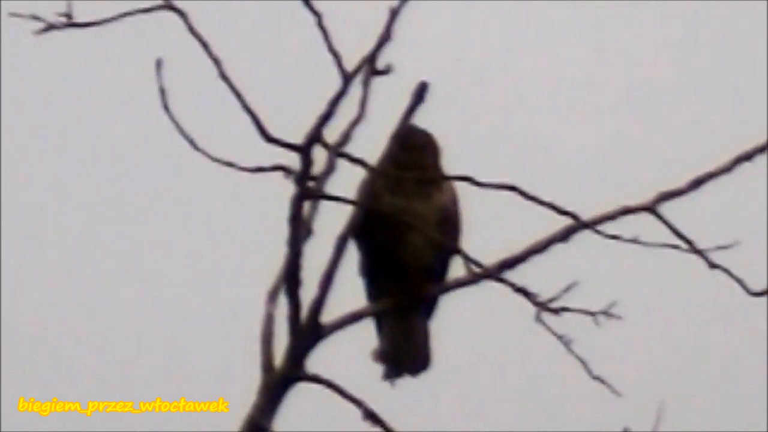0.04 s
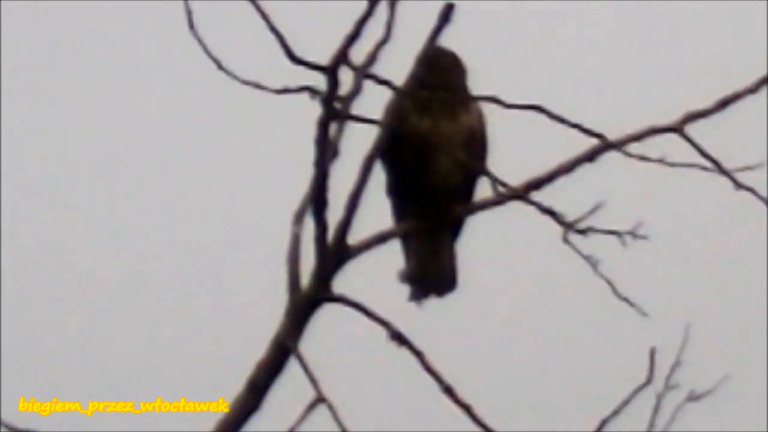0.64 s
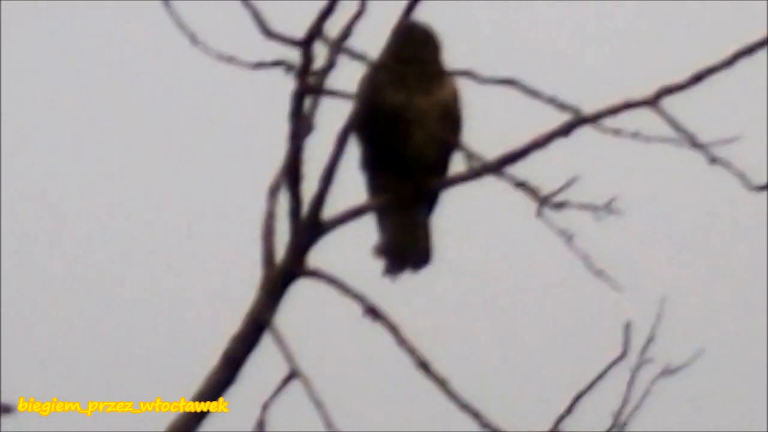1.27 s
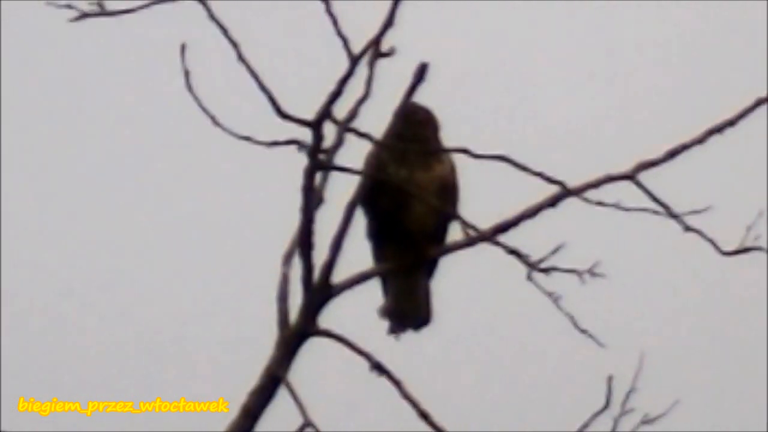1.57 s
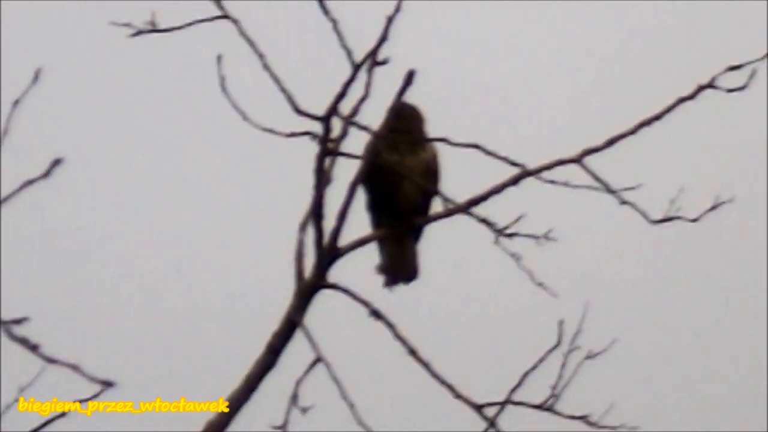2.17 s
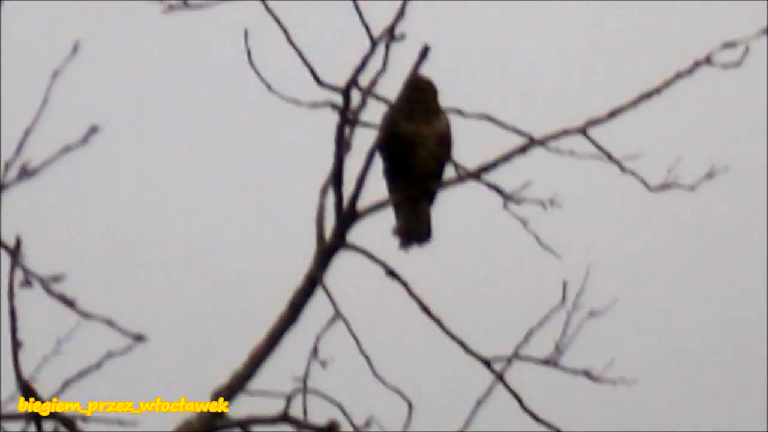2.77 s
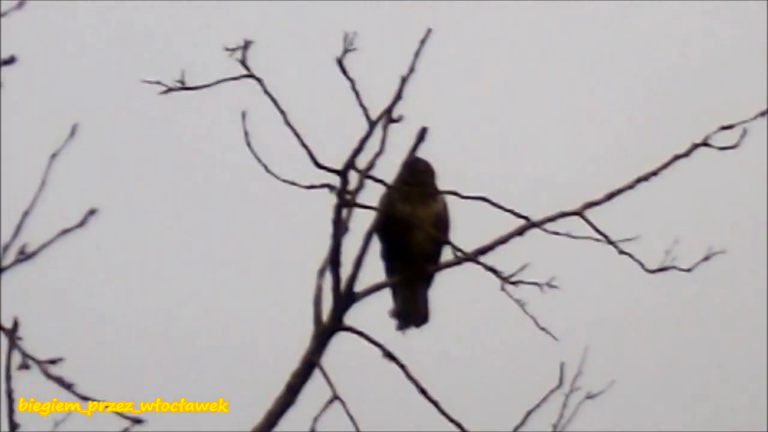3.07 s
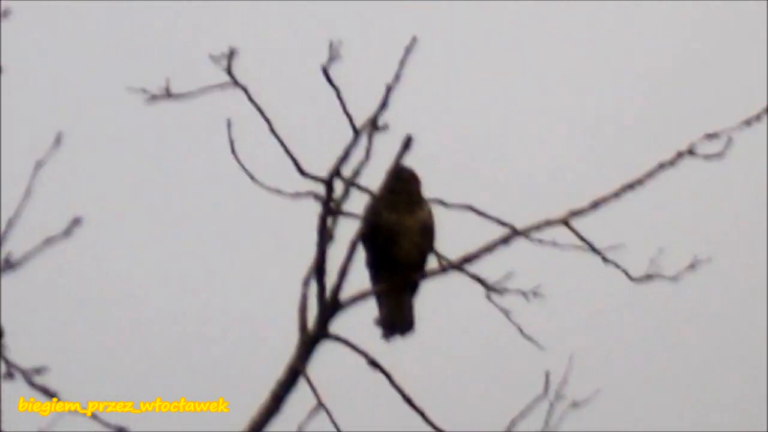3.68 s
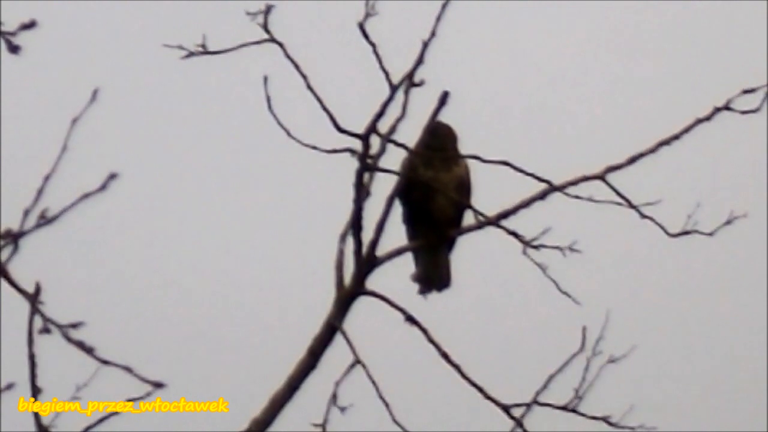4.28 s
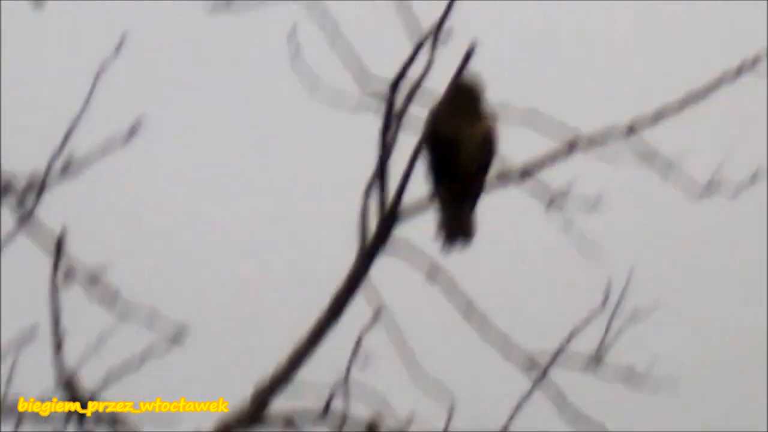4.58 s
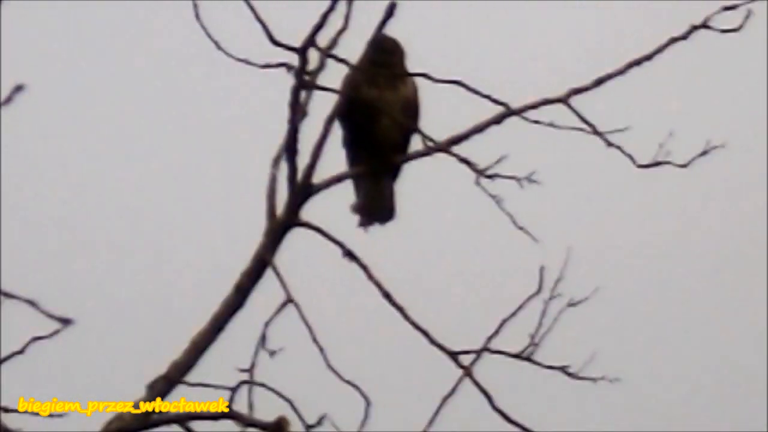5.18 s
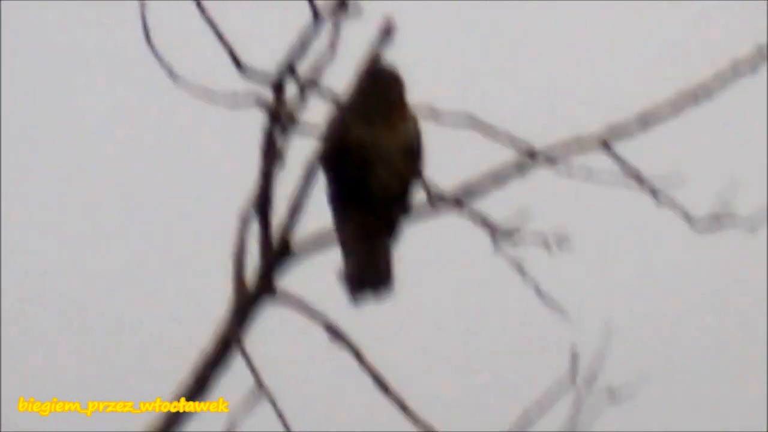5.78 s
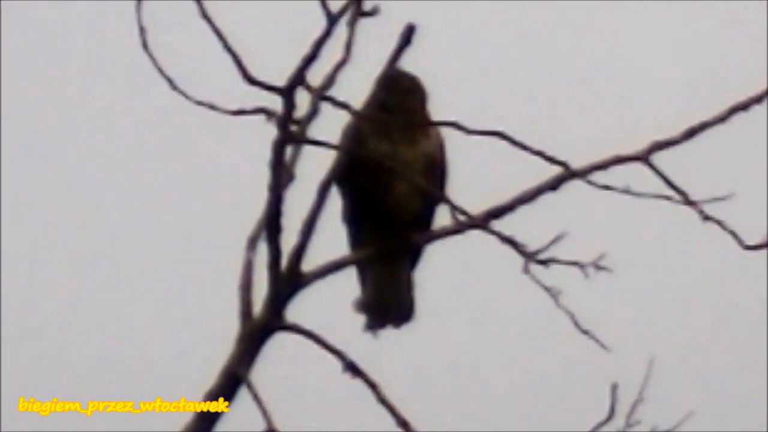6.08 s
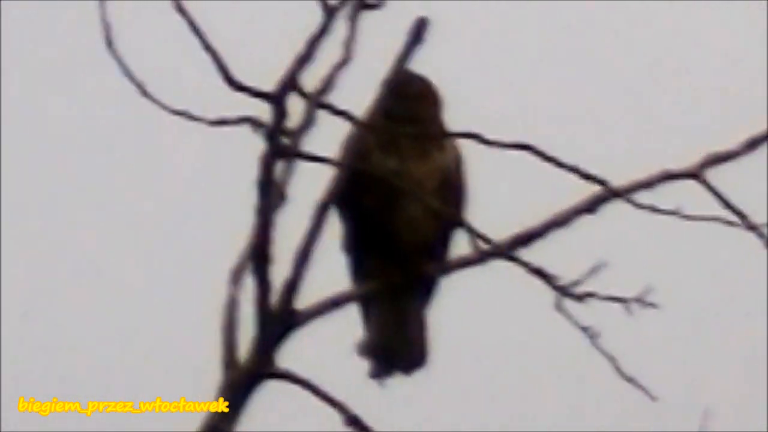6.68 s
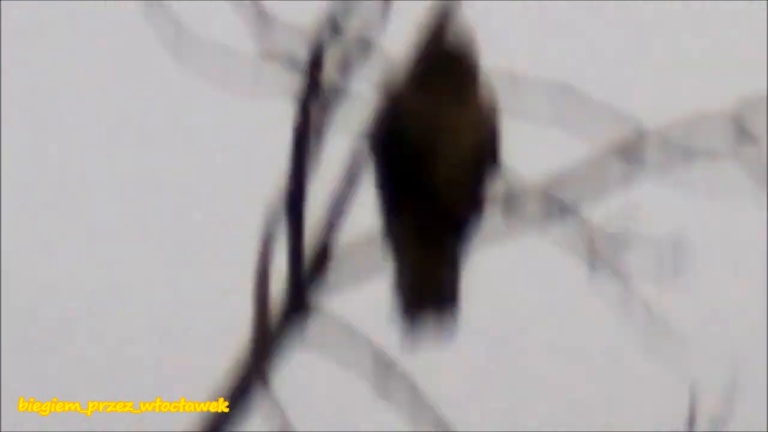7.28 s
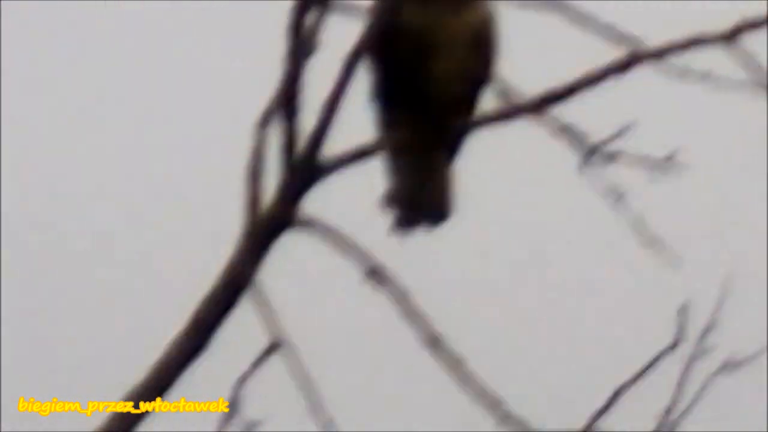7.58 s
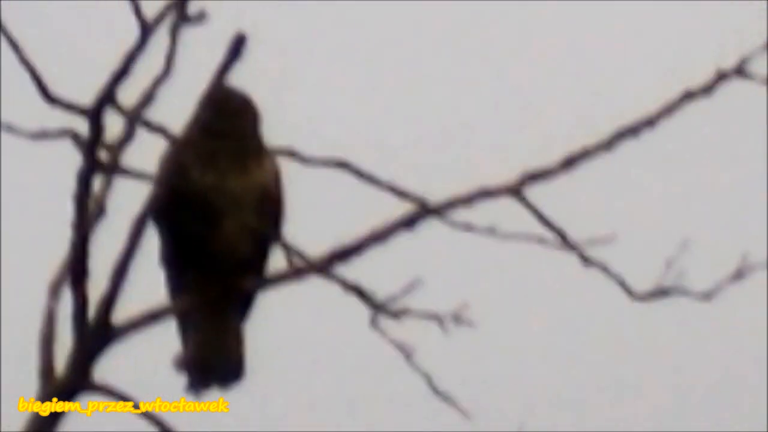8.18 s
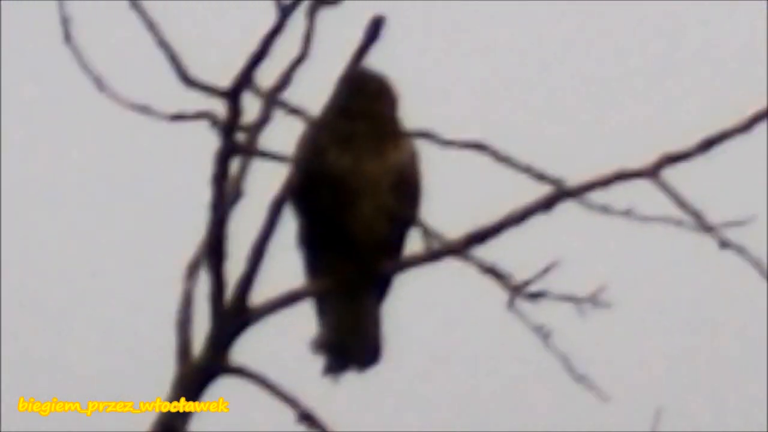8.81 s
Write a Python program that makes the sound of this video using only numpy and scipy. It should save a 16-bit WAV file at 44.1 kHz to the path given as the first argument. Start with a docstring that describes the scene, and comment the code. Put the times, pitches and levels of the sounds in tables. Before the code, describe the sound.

Sharp, irregular plastic clicks and faint finger rubs on a hand-held camera, over a soft, steady wash of outdoor wind.

```python
"""The plastic controls of a hand-held camera click in two stages, a blunt touch and a sharp snap,
ringing the case right at the microphone. Fingers rub and tick on the shell and the grip thumps softly.
Behind it, outdoors on a grey day, lies a steady, low wash of wind, and far-off traffic swells slowly."""
import sys
import numpy as np
from scipy import signal
from scipy.fft import rfft, irfft
from scipy.io import wavfile
from scipy.ndimage import uniform_filter1d

SR = 44100
rng = np.random.default_rng(int(sys.argv[2]) if len(sys.argv) > 2 else 0)


def persist_wave(psi):
    """Save psi, clipped to +-1, as 16-bit WAV."""
    counts = np.round(np.clip(psi, -1, 1) * 32767).astype(np.int16)
    wavfile.write(sys.argv[1], SR, np.atleast_2d(counts).T)


N = 390285
T = np.arange(N) / SR


def undb(db):
    """Decibels to gain."""
    return 10 ** (np.asarray(db) / 20)


def unit(x):
    """Scale to rms 1."""
    return x / np.sqrt(np.mean(x ** 2))


def add(out, s, x):
    """Mix x into out from time s on."""
    i = int(s * SR)
    out[i:i + len(x)] += x[:N - i]


def passband(x, hz, kind, order=2):
    """Butterworth filter."""
    return signal.sosfilt(signal.butter(order, np.minimum(hz, .45 * SR), kind, fs=SR, output="sos"), x)


def colour(x, points):
    """EQ x with a curve of (f/Hz, level/dB) points."""
    hz, db = np.transpose(points)
    f = np.maximum(np.fft.rfftfreq(len(x), 1 / SR), 1)
    return irfft(rfft(x) * undb(np.interp(np.log(f), np.log(hz), db)), len(x))


def drift(rate):
    """Smooth random modulation: values held 1 / rate s and slewed twice, rms 1."""
    hold = int(SR / rate)
    steps = np.repeat(rng.standard_normal(N // hold + 1), hold)
    return unit(uniform_filter1d(uniform_filter1d(steps, hold), hold)[:N])


def mode(hz, width_hz):
    """One decaying resonance, a tenth of a second long."""
    t = T[:SR // 10]
    return np.exp(-np.pi * width_hz * t) * np.sin(2 * np.pi * hz * t)


# EQ curve of the wind bed: f/Hz, level/dB
WIND_EQ = [(20, -28), (42, -7.5), (90, -6), (135, -3), (210, -1), (310, -3.5), (380, -5.5), (750, -8),
           (1000, -7.5), (1500, -16), (2560, -24), (5400, -29), (6400, -35.5), (8300, -63)]


def wind(level_db=-53.5, sway_db=0.76, flutter_db=0.5):
    """A low wash of wind that gently sways and flutters."""
    wash = unit(colour(rng.standard_normal(N), WIND_EQ))
    return wash * undb(level_db + sway_db * drift(rate=1.37) + flutter_db * drift(rate=9.3))


def traffic(tyre_db=-60.5, tyre_hz=1100, spread=1.476, nearest_s=6.6, swell_s=3.2, drone_db=-71):
    """Far-off tyre roar swells and recedes over a low engine drone."""
    tyres = unit(passband(rng.standard_normal(N), [tyre_hz / spread, tyre_hz * spread], "band"))
    distance = np.hypot(1, (T - nearest_s) / swell_s)  # half power swell_s either side of the crest
    drone = unit(passband(rng.standard_normal(N), [49, 53], "band"))
    return undb(tyre_db) * tyres / distance + undb(drone_db) * drone


def hiss(level_db=-76.5, low_cut_hz=6600):
    """A thin, even hiss on top of the bed."""
    return undb(level_db) * unit(passband(rng.standard_normal(N), low_cut_hz, "high", order=6))


# Soft thumps of the grip: t/s, level/dB, f/Hz
GRIP_THUMPS = [(1.897, -40, 154), (2.51, -35, 227), (4.479, -43, 93.4), (4.515, -44, 85), (4.905, -42, 119),
               (4.962, -39, 158), (5.872, -44, 84), (8.116, -40, 144)]


def thumps(decay_cycles=0.94):
    """The hand shifts its grip: a dull push that dies within a few cycles."""
    out, t = np.zeros(N), T[:SR // 8]
    for s, db, hz in GRIP_THUMPS:
        add(out, s, undb(db) * np.sin(2 * np.pi * hz * t) * np.exp(-t * hz / decay_cycles))
    return out


# Light, dry ticks of the shell: t/s, peak level/dB, centre f/Hz
SHELL_TICKS = [(3.8307, -39.5, 5500), (4.0184, -47, 3200), (4.159, -43.5, 3260), (5.214, -50, 4500),
               (8.1666, -45, 4000), (8.2483, -47, 4500), (8.3420, -47, 5200)]


def ticks(decay_s=0.0034, spread=1.21):
    """Tiny slips of the shell: a few milliseconds of bright crackle."""
    out, t = np.zeros(N), T[:SR // 25]
    for s, db, hz in SHELL_TICKS:
        burst = rng.standard_normal(len(t)) * np.exp(-t / decay_s)
        tick = passband(burst, [hz / spread, hz * spread], "band")
        add(out, s, undb(db) * tick / abs(tick).max())
    return out


# Modes of the plastic case: f/Hz, width/Hz, level/dB
CASE_MODES = [(242.0, 230, -21.0), (382, 55, -27), (772, 420, -9.5), (867, 71, -18), (1204, 125, -10.5),
              (1536, 96, -1.5), (1856, 200, 0), (2356, 110, -12), (2570, 106, -16.5), (3405, 331, -7.5),
              (4400, 770, -5.5), (5130, 220, -14.5), (5720, 340, -11), (7927, 190, -26), (8460, 970, -16.5),
              (10660, 480, -29)]


def case_ring(treble_db, bass_db, treble_hz=2400, bass_hz=1000):
    """The case after one contact; a hard contact favours the high modes, a blunt one the low."""
    hz, width_hz, db = np.transpose(CASE_MODES)[:, :, None]
    high_shelf_db = treble_db / (1 + (treble_hz / hz) ** 6)
    low_shelf_db = bass_db / (1 + (hz / bass_hz) ** 6)
    # the microphone sits across the case from the finger, so neighbouring modes swing opposite ways
    polarity = (-1) ** np.arange(len(CASE_MODES))[:, None]
    return np.sum(polarity * undb(db + high_shelf_db + low_shelf_db) * mode(hz, width_hz), axis=0)


# EQ curve of skin sliding on plastic: f/Hz, level/dB
SKIN_EQ = [(900, -36), (2700, -0.5), (3600, -2), (4600, -1), (5800, -2.5), (7500, -21), (11000, -29)]
# Finger strokes; a drag builds until the skin sticks, a slide starts at once and fades:
# peak t/s, attack/s, release/s, level/dB
FINGER_RUBS = [(1.388, .02, 0.0092, -52), (1.41, .003, 0.11, -54), (1.618, .003, 0.072, -54.5),
               (2.635, 0.016, .006, -43), (2.68, .003, .035, -56), (3.945, .003, 0.057, -53),
               (3.998, 0.016, .012, -53), (4.487, .003, 0.04, -63), (4.729, .002, 0.046, -59.5),
               (5.175, .012, 0.042, -58.5), (5.301, 0.037, .004, -47.5), (8.343, 0.0096, 0.022, -56)]


def rubs(slips_per_s=3000, scatter_db=3.5, crackle_db=-13, crackle_hz=6500,
         rest_db=-87, fidget_db=4, press_db=-56.5, knee_db=0.2, max_body_share=0.87):
    """Dense stick-slip grains hiss at the skin and, under pressure, crackle and ring the case."""
    slips = (rng.random(N) < slips_per_s / SR) * rng.choice([-1, 1], N)
    slips = slips * undb(scatter_db * rng.standard_normal(N))
    skin = unit(colour(slips, SKIN_EQ))
    ring = unit(signal.fftconvolve(slips, case_ring(treble_db=-10, bass_db=7))[:N])
    body = ring + undb(crackle_db) * unit(passband(slips, crackle_hz, "high"))
    out = skin * undb(rest_db + fidget_db * drift(rate=9))  # resting fingers fidget faintly
    for s, attack_s, release_s, db in FINGER_RUBS:
        # a rub louder than press_db bears down hard enough to ring the case
        body_share = max_body_share / (1 + np.exp((press_db - db) / knee_db))
        stroke = np.exp(np.where(T < s, (T - s) / attack_s, -((T - s) / release_s) ** 2))
        out += undb(db) * stroke * (np.sqrt(body_share) * body + np.sqrt(1 - body_share) * skin)
    return out


# Parts inside the case that give each click a faint tail: f/Hz, level/dB, t60/s
INNER_MODES = [(431, -9, 0.098), (1222, 6, 0.066), (1766, 1, 0.064), (2775, 6, 0.037), (3160, -3.5, 0.058),
               (4082, -1, 0.03), (4720, -14, 0.078)]


def contact(treble_db, bass_db, part_hz, part_db, grit=0.013, grit_s=0.0062,
            rebound_s=0.001147, rebound_gain=0.17, rebound_hz=3500, tail_db=-26, low_cut_hz=150):
    """Plastic lands, scrapes for a moment and lands again more softly; inner parts ring on."""
    t = T[:SR // 10]
    impact = t == 0
    rebound = passband(np.maximum(1 - abs(t - rebound_s) * SR, 0), rebound_hz, "low", order=1)
    scrape = rng.standard_normal(len(t)) * np.exp(-t / grit_s)
    force = impact + rebound_gain * rebound + grit * scrape
    # the struck part swings with the nearest mode of the case
    polarity = (-1) ** np.argmin([abs(hz - part_hz) for hz, _, _ in CASE_MODES])
    part = polarity * mode(part_hz, width_hz=300)
    tail = sum(undb(db) * mode(hz, np.log(1000) / (np.pi * t60)) for hz, db, t60 in INNER_MODES)
    body = case_ring(treble_db, bass_db) + undb(part_db) * part + undb(tail_db) * tail
    # so small a shell radiates no deep bass
    ring = passband(signal.fftconvolve(force, body), low_cut_hz, "high")
    return ring / np.sqrt(np.sum(ring ** 2) / (SR / 100))  # the energy of 10 ms at rms 1


# Clicks of the controls:
# t/s, touch level/dB, travel/ms, snap level/dB, treble shelf/dB, bass shelf/dB, struck part f/Hz
CONTROL_CLICKS = [(1.3197, -25, 3.7, -37.5, 0, 1, 3057), (1.396, -34, 0.99, -36.5, -13, 0, 2500),
                  (1.5994, -19.5, 2.67, -30.5, -2, 4.5, 4320), (1.6259, -44, 1.83, -54, -7, 24, 640),
                  (1.9650, -38, 1.88, -43.5, -6, 20, 935), (2.6461, -37, 2.7, -36, -3, 19, 1160),
                  (2.6656, -28, 3.4, -32.5, 2.5, -19, 6530), (3.9176, -37.5, 1.6, -45.5, -1, -20, 1160),
                  (3.943, -45, 2.54, -49, -14, -4, 1145), (5.0179, -36.5, 2.5, -30.5, -2.5, 16.5, 2100),
                  (5.222, -47, 4.8, -58, -12, 4, 570), (7.5686, -27.5, 2.77, -14.5, 2.5, 18.5, 2360),
                  (7.5889, -36.5, 2.5, -45, 8, 23, 2850)]


def clicks(snap_treble_db=2, snap_bass_db=-20.5):
    """A control touches its catch, travels a few milliseconds and snaps home, harder and thinner."""
    out = np.zeros(N)
    for s, touch_db, travel_ms, snap_db, treble_db, bass_db, part_hz in CONTROL_CLICKS:
        touch = contact(treble_db, bass_db, part_hz, part_db=-7.5)
        snap = contact(treble_db + snap_treble_db, bass_db + snap_bass_db, part_hz, part_db=-3)
        add(out, s, undb(touch_db) * touch)
        add(out, s + travel_ms / 1000, undb(snap_db) * snap)
    return out


def scene():
    """Close handling noise over the outdoor bed, in mono."""
    handling = clicks() + ticks() + rubs() + thumps()
    bed = wind() + traffic() + hiss()
    return (handling + bed)[None]


def record(dry, notches_hz=(7000, 8500, 10000), notch_width_hz=900, top_hz=11000):
    """The camera's sound path has three narrow notches in the treble and a steep top cut."""
    for hz in notches_hz:
        dry = signal.lfilter(*signal.iirnotch(hz, hz / notch_width_hz, fs=SR), dry)
    return signal.sosfilt(signal.ellip(10, .2, 70, top_hz, fs=SR, output="sos"), dry)


dry = scene()
out = record(dry)
persist_wave(out)
```